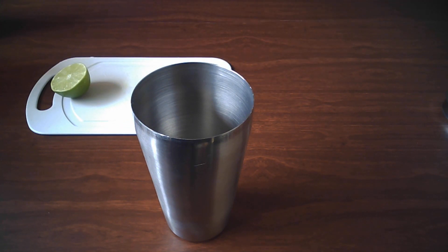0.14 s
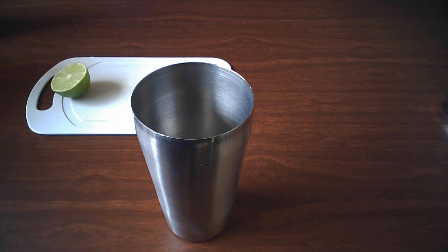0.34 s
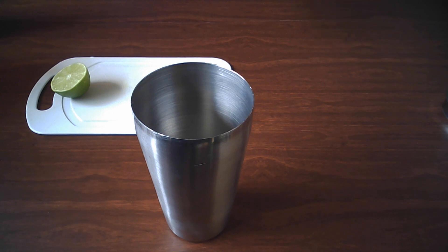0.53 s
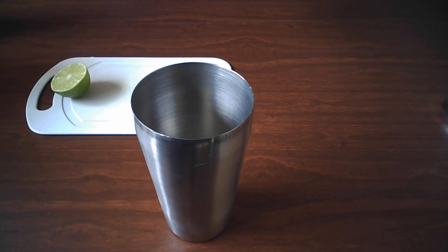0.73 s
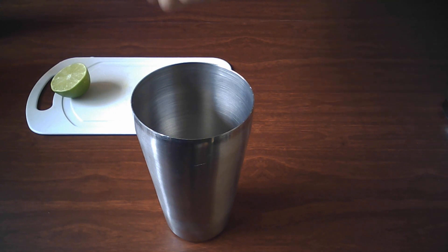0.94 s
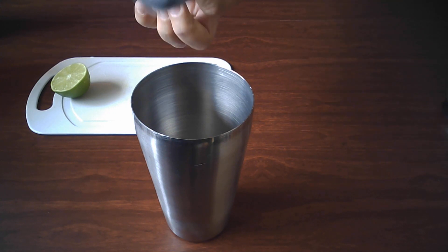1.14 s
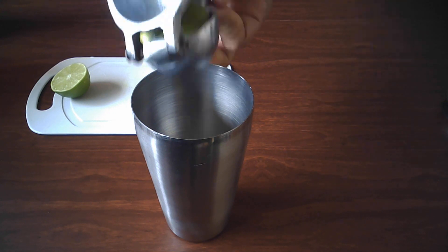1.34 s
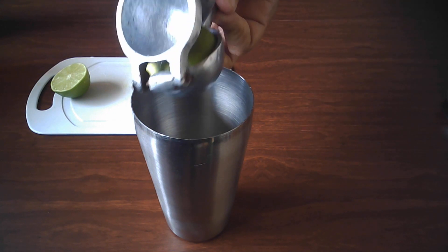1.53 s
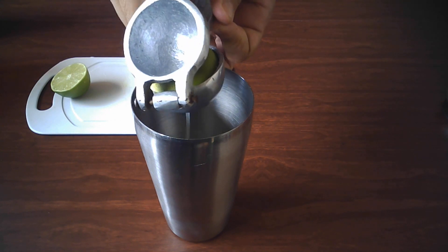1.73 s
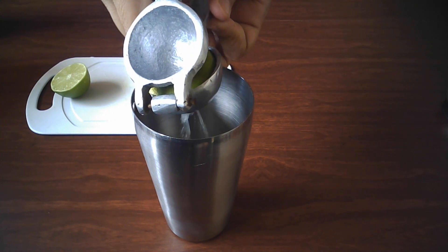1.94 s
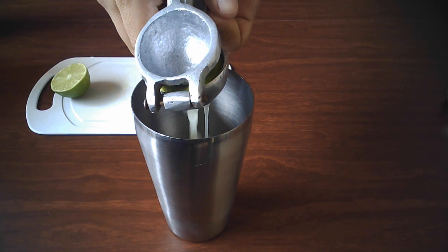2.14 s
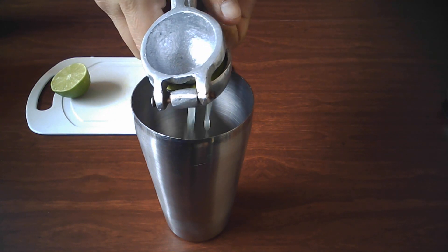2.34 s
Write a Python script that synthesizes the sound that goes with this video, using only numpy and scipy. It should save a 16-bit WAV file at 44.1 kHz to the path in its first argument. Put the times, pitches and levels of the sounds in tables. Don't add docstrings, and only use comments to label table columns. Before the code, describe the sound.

Short dry metal clack of a hand squeezer with handle knocks, room echo dying away, near silence, then soft wet crackling and drops spattering in a metal cup, recorded indoors by a camera microphone with faint buzz.

```python
import sys
import numpy as np
from scipy import signal
from scipy.fft import rfft, irfft
from scipy.io import wavfile
from scipy.ndimage import uniform_filter1d

SR = 44100
rng = np.random.default_rng(int(sys.argv[2]) if len(sys.argv) > 2 else 0)


def dump_mix(stems):
    frames = np.atleast_2d(stems).T
    limited = np.clip(frames, -1, 1)
    pcm = np.round(limited * 32767).astype(np.int16)
    wavfile.write(sys.argv[1], SR, pcm)


def boost(x):
    u = np.asarray(x, float) / 20
    return 10 ** u


N = 105840
T = np.arange(N) / SR

# (frequency [Hz], density [dB per Hz])
FLOOR_SPECTRUM = [(12, -42.5), (20, -3), (128, -19.5), (231, -18.5), (276, -20.5), (534, -27), (672, -30),
                  (5290, -37.5), (8800, -42), (11400, -70), (19400, -120)]
# (harmonic number, level [dB])
BUZZ_HARMONICS = [(1, -76), (2, -72.5), (3, -68), (4, -71), (5, -65), (6, -70.5), (7, -72)]
# (delay [s], level [dB])
REFLECTIONS = [(.0085, -22), (.0115, -22), (0.016, -14.5), (0.021, -17), (.0285, -19), (.035, -24),
               (0.042, -24), (0.046, -19.5), (0.05, -24), (0.054, -22), (0.067, -27.5), (0.072, -24.5),
               (.088, -27), (0.092, -26.5), (.121, -27.5)]
# (time [s], length [s], level [dB], frequency [Hz], width [Hz])
RUSTLES = [
    (0.222, 0.068, -48, 3960, 5060),
    (0.72, 0.12, -64.5, 6500, 3140),
    (0.85, 0.1, -72.5, 1970, 513),
    (0.933, 0.1, -64, 4780, 380),
    (1.022, 0.065, -66.5, 6000, 3680),
    (1.9, 0.044, -75, 2370, 330),
]
KNOCK_TIMES_S = [.0065, .0145, .0915, .0917, .1548, .1555, .2158, .2162, .22, .24, .1548, .204, .112, .119,
                 .163]
# (level [dB], frequency [Hz], t60 [s])
KNOCK_MODES = [(-33.5, 1950, .03), (-40, 1300, 0.024), (-38, 2400, .012), (-49.5, 8000, 0.011),
               (-32, 6100, 0.009), (-36, 4200, 0.0095), (-26, 1980, 0.0085), (-30.5, 2850, 0.0094),
               (-32, 1700, 0.011), (-22, 1720, .017), (-38.5, 4800, 0.013), (-45, 4800, .01),
               (-49.5, 1950, .02), (-50, 1950, 0.047), (-45.5, 1950, 0.025)]
# (time [s], squelch level [dB])
EFFORT = [
    (1.38, -96.5),
    (1.47, -70.5),
    (1.602, -67.5),
    (1.68, -67),
    (1.821, -68.5),
    (1.98, -66),
    (2.03, -61.5),
    (2.2, -64),
    (2.4, -68),
]
# (frequency [Hz], width [Hz], level [dB])
CUP_MODES = [(1286, 400, -10.5), (2403, 820, -1), (4500, 1200, -12.5), (5900, 700, -6), (7200, 950, 0)]
SPURT_TIMES_S = [1.49, 1.562, 1.58, 1.599, 1.62, 1.636, 1.742, 1.8, 1.87, 1.94, 1.98, 2.068, 2.19]
# (length [s], extra level [dB])
SPURT_SHAPES = [(.02, 9.6), (0.02, 16.6), (0.016, 11.7), (0.027, 14.6), (0.011, 6.5), (0.013, 6.5),
                (0.027, 9.8), (.03, 5), (0.023, 4.5), (.02, 3), (0.012, 3), (0.011, 6), (.01, 11)]
# (time [s], level [dB], frequency [Hz])
TICKS = [(1.2744, -52.5, 2500), (1.2978, -66, 2440), (1.3189, -55.5, 7130), (1.393, -62, 2476),
         (1.475, -54, 6160), (1.4876, -53, 6830), (1.7385, -50.5, 6360), (1.909, -47.5, 6500),
         (1.934, -56, 7300), (2.0063, -55, 7300), (2.0246, -48, 7400), (2.025, -52, 4800),
         (2.04, -47.5, 5100), (2.0454, -72, 7200), (2.0634, -36, 7280), (2.067, -43.5, 8000),
         (2.1286, -40, 5960), (2.1145, -57, 5400), (1.5544, -54, 7240), (1.5546, -57, 2340),
         (1.605, -53, 5220), (1.8722, -52, 7250), (1.4143, -57, 6130), (1.5175, -54, 7280),
         (2.1829, -33.5, 7150), (2.1832, -36.5, 5220), (2.1885, -39, 6575), (2.1775, -49, 5400),
         (2.1675, -51, 4800), (2.2216, -49, 7040), (2.2345, -41, 6170), (2.2458, -41.5, 5000),
         (2.246, -42, 7660), (2.2685, -49.5, 2760), (2.3225, -52, 4860), (2.314, -49, 3800),
         (2.2704, -49.5, 6500), (2.2949, -43.5, 2500), (2.3221, -45, 6630), (2.3408, -42.5, 3970),
         (2.3501, -41.5, 5170), (2.37, -46, 7770)]
# (time [s], level [dB], frequency [Hz], t60 [s], glide [ratio per s], bubble bursts after [s])
PLOPS = [(2.021, -53.5, 1247, 0.053, 1.5, 0.018), (2.039, -45.5, 1280, 0.022, 1.1, .02),
         (2.304, -24.5, 1174, 0.0096, 18, 0.012), (2.313, -36, 1313, 0.25, 24, 0.01),
         (2.308, -41, 1250, .02, 8, .004), (2.325, -44, 1480, 0.04, 2.1, .0045),
         (2.3295, -46, 1520, .03, 2.5, .006), (2.370, -48, 1300, .04, 3, 0.0058),
         (2.377, -43.5, 1230, .09, 2.3, 0.0075), (2.391, -54, 1369, 0.046, 3, 0.0043)]
# (time [s], peak [dB])
SPLASHES = [(1.917, -75), (1.963, -58), (2.036, -56), (2.044, -49), (2.061, -52), (2.068, -47.5),
            (2.128, -58.5), (2.233, -44), (2.294, -50), (2.376, -51)]
# (time [s], level [dB], looseness [ring stretch], tilt [dB per octave], crack [dB])
BLOWS = [
    (.0035, -23, 1.48, 2.0, 6.),
    (0.1539, -27.5, .4, -1.5, 8.5),
    (.2040, -41, 0.43, -0.5, 7.5),
    (0.228, -0.5, 0.95, -0.5, -1),
]
# (frequency [Hz], level [dB], start after blow [s], clamped after [s])
CASTING_MODES = [(1207, -38.5, 0.00091, 0.0037), (1900, -33, 0.0012, .003), (2684, -27, 0.00083, .004),
                 (2916, -25, 0.00033, 0.0022), (3800, -26, .0004, .002), (3530, -29.5, 0.00077, .002),
                 (4870, -26, .0004, 0.0035), (6150, -29, .0005, .002), (4614, -11, 0.00012, 0.0022),
                 (7595, -10, .0012, .0047), (8440, -18, 0.00073, 0.0056), (5787, -20, .0008, .0032),
                 (6500, -22.5, .0005, 0.0044), (7270, -16.5, 0.0014, 0.0032)]
# (frequency [Hz], level [dB], t60 [s])
FREE_MODES = [(4928, -57.5, 0.67), (4930, -52, 0.62), (7900, -51.5, 0.5), (7440, -44.5, 0.31)]

TIN_HZ = 658
SPRAY_FROM_S = 2.02
SOFT_RISE_S = 0.0006


def band(x, hz, width_hz):
    return signal.lfilter(*signal.iirpeak(hz, hz / width_hz, fs=SR), x)


def steep_band(x, hz, width_hz):
    return band(band(x, hz, width_hz), hz, width_hz)


def unit(x):
    return x / np.sqrt(np.mean(x ** 2))


def walk(rate_hz, size=N):
    k = int(SR / rate_hz)
    steps = np.repeat(rng.standard_normal(size // k + 1), k)
    return unit(uniform_filter1d(steps, k)[:size])


def add_mode(out, at_s, db, hz, t60_s, rise_s=0.00013, glide=0.0, clamp_s=0.98):
    i = int(at_s * SR)
    t = np.arange(min(int(1.3 * t60_s * SR), N - i)) / SR
    mute = 1 + np.exp(np.clip((t - clamp_s) / 0.0005, -50, 50))
    env = (1 - np.exp(-t / rise_s)) * boost(-60 * t / t60_s) / mute
    phase = 2 * np.pi * hz * (t + glide * t ** 2 / 2)
    out[i:i + len(t)] += boost(db) * env * np.sin(phase)


def add_burst(out, at_s, db, low_hz, t60_s):
    i, t = int(at_s * SR), T[:int(t60_s * SR)]
    sos = signal.butter(3, [low_hz, 9000], "band", fs=SR, output="sos")
    noise = unit(signal.sosfilt(sos, rng.standard_normal(N // 4)))[:len(t)]
    env = boost(db - 60 * t / t60_s) * (1 - np.exp(-t / SOFT_RISE_S))
    out[i:i + len(t)] += (noise * env)[:N - i]


def crackle():
    rate_per_s, spread_db = 5000, 1.5
    pops = rng.random(N) < rate_per_s / SR
    return pops * boost(spread_db * rng.exponential(size=N)) * rng.standard_normal(N)


def floor():
    hiss_db, fan_db = -58.5, -75
    buzz_hz, table_hz, table_width_hz = 25.1, 34.4, 8.0
    table_db, lean_db_per_s = -72, 6.5
    f = np.maximum(np.arange(N // 2 + 1) * SR / N, 1)
    hz, db = np.array(FLOOR_SPECTRUM).T
    shape = boost(np.interp(np.log(f), np.log(hz), db)) * (f > 12)
    hiss = boost(hiss_db) * unit(irfft(rfft(rng.standard_normal(N)) * shape, N))
    fan = boost(fan_db) * unit(band(rng.standard_normal(N), 692, 48))
    tremble = unit(steep_band(rng.standard_normal(N), table_hz, table_width_hz))
    table = boost(table_db + lean_db_per_s * T) * tremble
    buzz = np.zeros(N)
    for k, level_db in BUZZ_HARMONICS:
        tone = np.sqrt(2) * np.sin(2 * np.pi * (k * buzz_hz * T + rng.random()))
        buzz += boost(level_db + 2.5 * walk(5)) * tone
    return hiss + buzz + fan + table


def room(x):
    t60_s, tail_db, lumpy_db = 0.53, -10, 1
    gap_s, swell_s = 0.0034, 0.026
    low_hz, wall_hz, wall_width_hz, wall_db = 1280, 3120, 4000, -10
    t = T[:int(0.8 * SR)]
    swell = (1 - np.exp(-np.clip(t - gap_s, 0, 1) / swell_s)) ** 2
    decay = boost(-60 * t / t60_s + lumpy_db * walk(300, size=len(t)))
    tail = rng.standard_normal(len(t)) * decay * swell
    tail *= boost(tail_db) / np.sqrt(np.sum(tail ** 2))
    delay_s, db = np.array(REFLECTIONS).T
    tail[(delay_s * SR).astype(int)] += boost(db) * (-1) ** np.arange(len(db))
    walls = x + boost(wall_db) * band(x, wall_hz, wall_width_hz)
    walls = signal.lfilter(*signal.butter(1, low_hz, "high", fs=SR), walls)
    return signal.fftconvolve(walls, tail)[:N]


def lingering():
    out = np.zeros(N)
    add_burst(out, 0, -45.5, 1310, 0.59)
    return out


def sleeves():
    noise, out = rng.standard_normal(N), np.zeros(N)
    for at_s, length_s, db, hz, width_hz in RUSTLES:
        swell = np.exp(-((T - at_s) / (length_s / 2)) ** 2)
        out += boost(db) * unit(band(noise, hz, width_hz)) * swell
    return out


def knocks():
    out = np.zeros(N)
    for at_s, (db, hz, t60_s) in zip(KNOCK_TIMES_S, KNOCK_MODES):
        add_mode(out, at_s, db, hz, t60_s, rise_s=SOFT_RISE_S)
    return out


def droplets():
    out = np.zeros(N)
    for when, pitch, size in rng.random((160, 3)):
        at_s = SPRAY_FROM_S + when * (T[-1] - SPRAY_FROM_S)
        add_mode(out, at_s, -57 + 8 * size ** 2, 3900 + 4200 * pitch, 0.008, rise_s=0.00046, glide=8.0)
    return out


def squelch():
    spray_db, air_db = -1.5, -5
    shared = crackle()
    cup = np.zeros(N)
    for hz, width_hz, db in CUP_MODES:
        cup += boost(db) * unit(steep_band(0.26 * shared + crackle(), hz, width_hz))
    cup = unit(cup)
    air = boost(air_db) * unit(band(crackle(), TIN_HZ, 110))
    spray = boost(spray_db) * unit(steep_band(crackle(), 6000, 3500))
    spray *= np.clip((T - SPRAY_FROM_S) / 0.0083, 0, 1)
    spurt_db = np.zeros(N)
    for at_s, (length_s, extra_db) in zip(SPURT_TIMES_S, SPURT_SHAPES):
        spurt_db += extra_db * np.exp(-((T - at_s) / (length_s / 2)) ** 4)
    s, effort_db = np.array(EFFORT).T
    effort = boost(np.interp(T, s, effort_db, left=-120))
    return ((cup + spray) * boost(spurt_db + 2 * walk(150)) + air) * effort


def juice():
    out, pool = np.zeros(N), np.zeros(N)
    for at_s, db, hz in TICKS:
        add_mode(out, at_s, db + 0.5, hz, 0.013, rise_s=0.00018, glide=4.2)
        add_burst(out, at_s, db - 9, 3300, 0.019)
    for at_s, db, hz, t60_s, glide, burst_s in PLOPS:
        add_mode(pool, at_s, db, hz, t60_s, rise_s=SOFT_RISE_S, glide=glide, clamp_s=burst_s)
    for at_s, db in SPLASHES:
        add_mode(out, at_s, db - 1, TIN_HZ, 0.11, rise_s=0.0016)
    return out + pool * boost(2 * walk(500))


def squeezer():
    out = np.zeros(N)
    for at_s, db, loose, tilt, crack_db in BLOWS:
        for hz, mode_db, late_s, clamp_s in CASTING_MODES:
            level_db = db + mode_db + tilt * np.log2(hz / 5000)
            grip_s = clamp_s * loose
            add_mode(out, at_s + late_s * loose, level_db, hz, 0.12, rise_s=0.28 * grip_s, clamp_s=grip_s)
        for hz, mode_db, t60_s in FREE_MODES:
            add_mode(out, at_s, db + mode_db, hz, t60_s, rise_s=0.002)
        add_burst(out, at_s, db + crack_db - 17.5, 1164, 0.035 * loose)
    return out


def scene():
    knock_send_db, wet_send_db = -4, -3.5
    metal, taps = squeezer(), knocks()
    wet = juice() + squelch() + droplets()
    send = metal + boost(knock_send_db) * taps + boost(wet_send_db) * wet
    mix = lingering() + metal + taps + wet + room(send) + sleeves() + floor()
    return mix[None]


def band_limit(x):
    return signal.sosfilt(signal.butter(12, 9730, fs=SR, output="sos"), x)


def record(dry):
    top_hz, offset = 8180, 0.0056
    low_pass = signal.cheby2(14, 60, top_hz * 1.1383, fs=SR, output="sos")
    mix = signal.sosfilt(low_pass, dry) + offset
    return band_limit(mix)


dry = scene()
out = record(dry)
dump_mix(out)
```